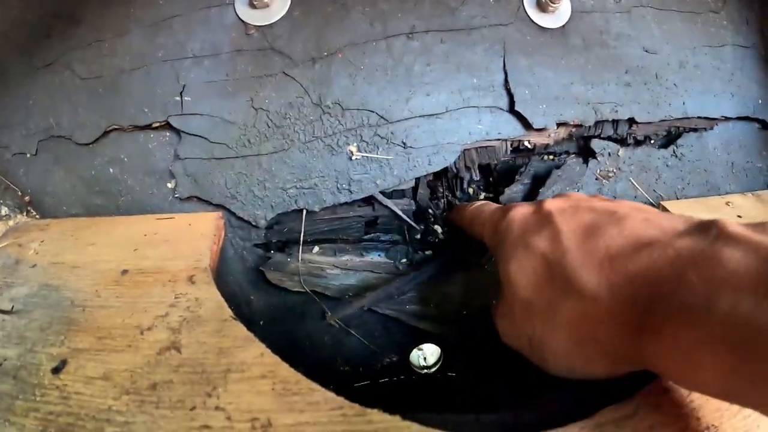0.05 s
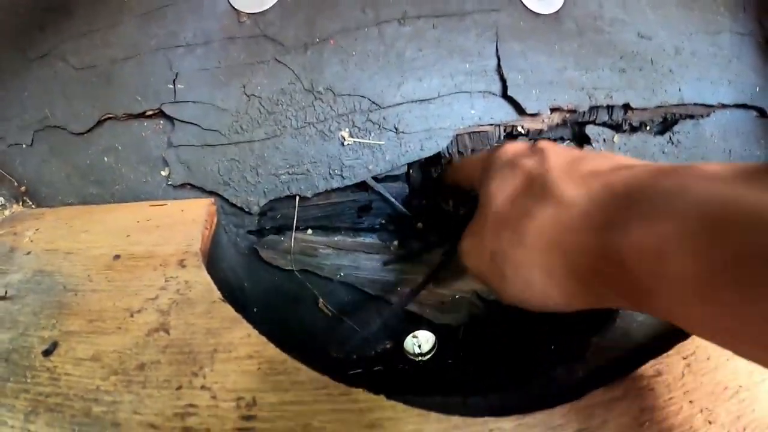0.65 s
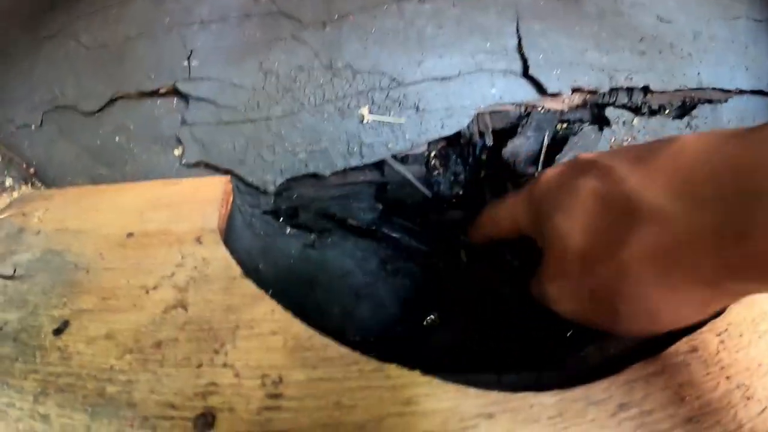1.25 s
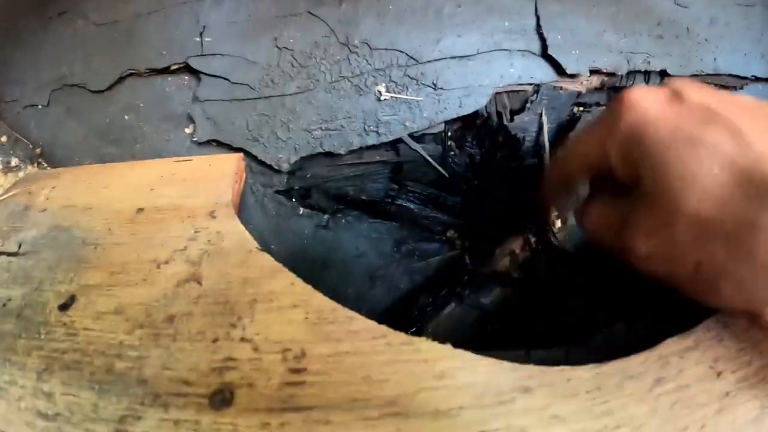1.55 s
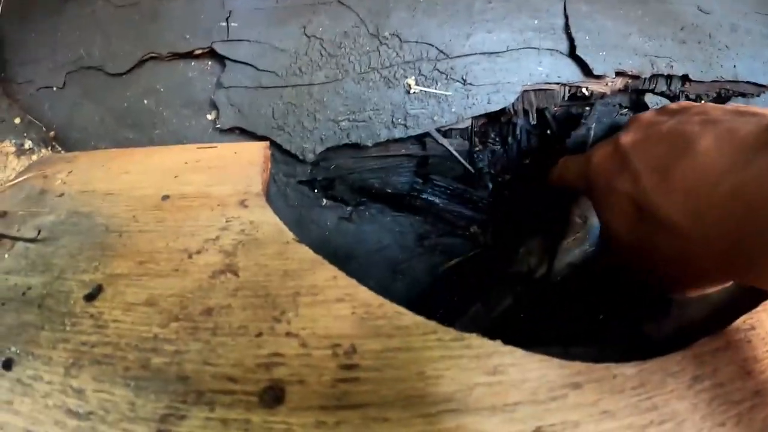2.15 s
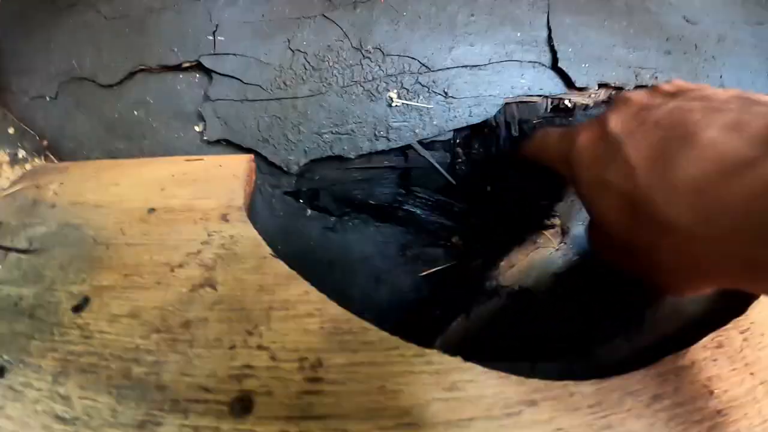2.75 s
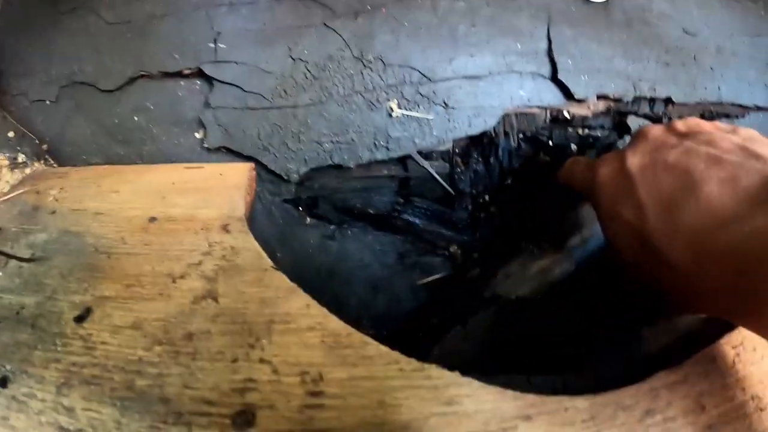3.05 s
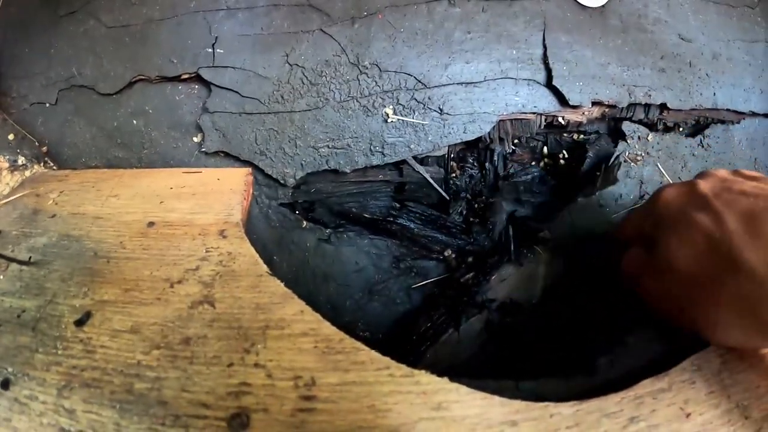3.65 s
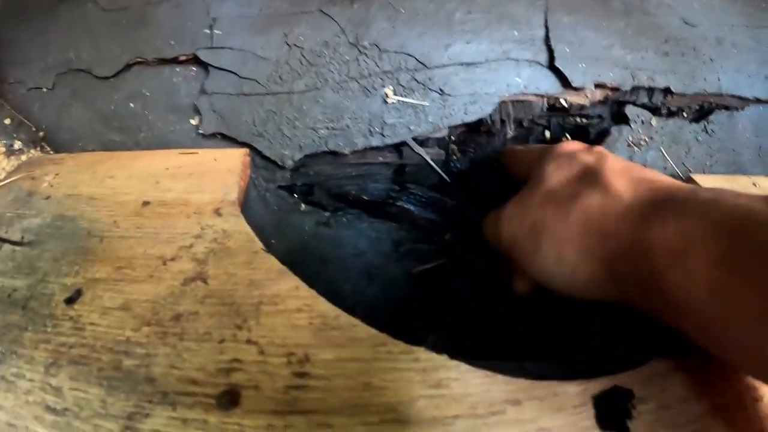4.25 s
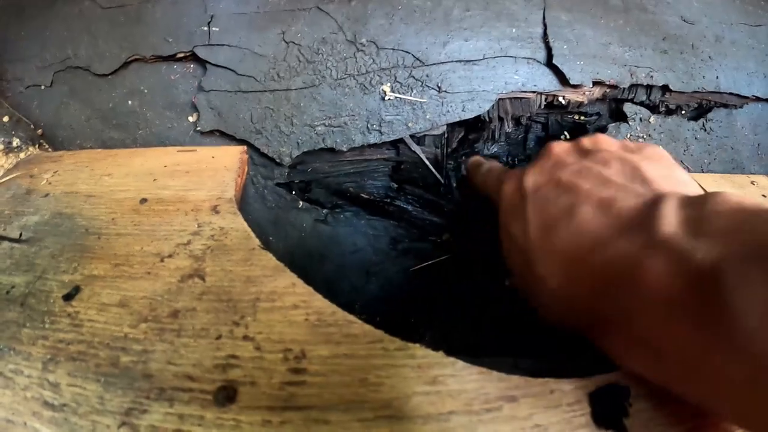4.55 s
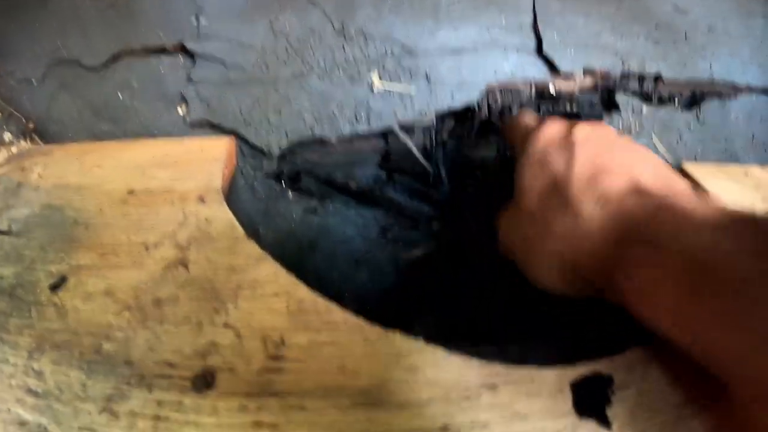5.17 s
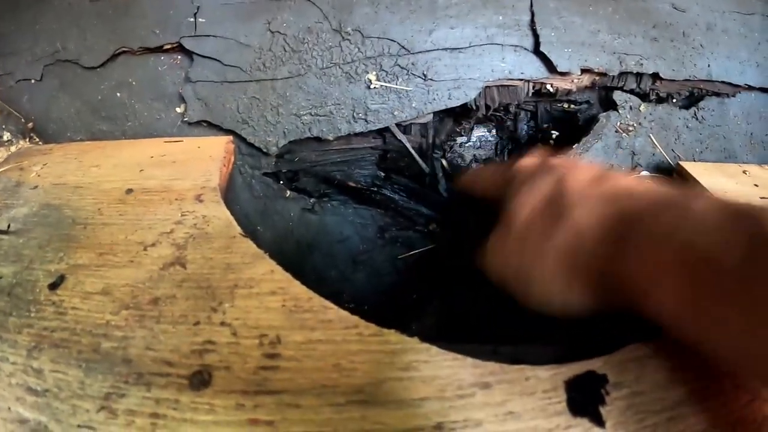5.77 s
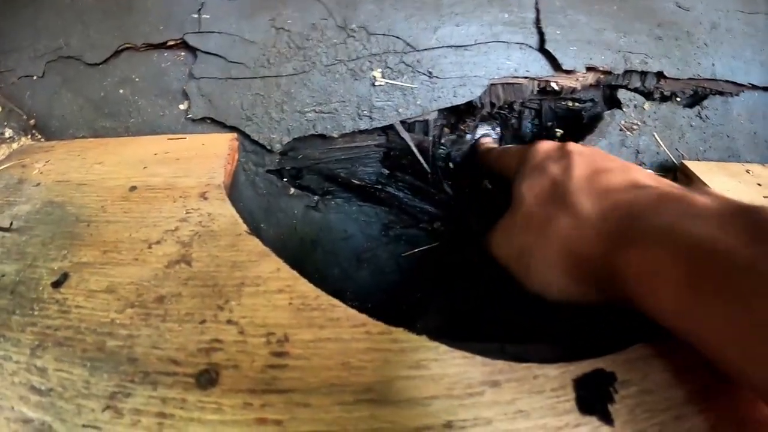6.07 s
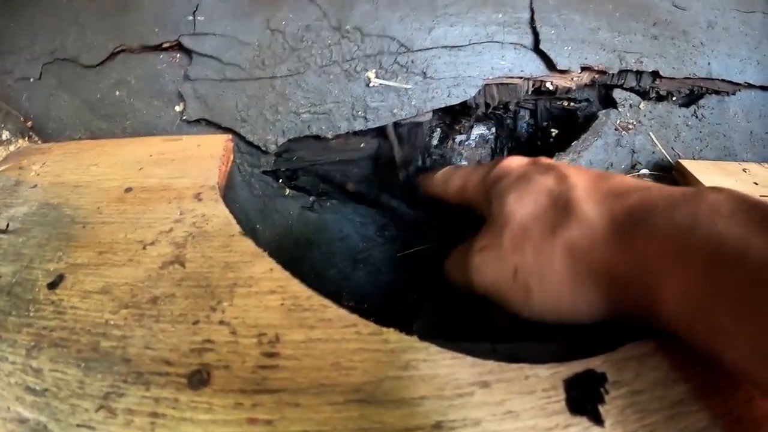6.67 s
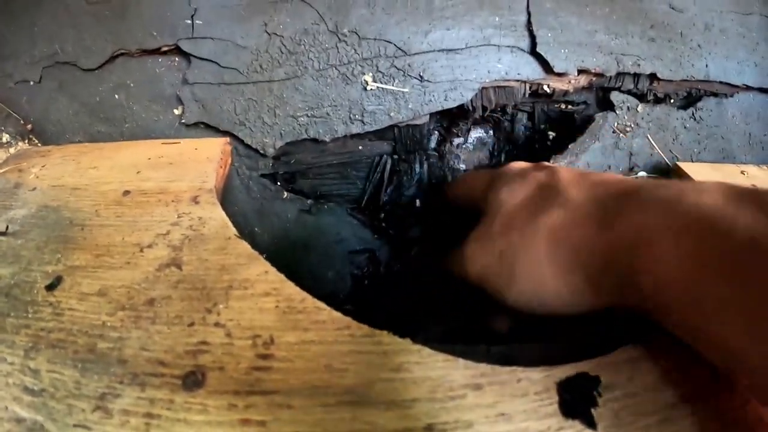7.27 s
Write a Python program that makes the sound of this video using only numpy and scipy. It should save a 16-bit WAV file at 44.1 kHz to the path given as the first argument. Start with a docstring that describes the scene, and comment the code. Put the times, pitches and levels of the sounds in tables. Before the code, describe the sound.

Decayed wood cracks and crumbles under a digging hand, with dull thumps on hollow boards and a low room rumble.

```python
"""Rotten wood snaps and crumbles as fingers tear it out of a hole in a boarded panel, close up.
Each fibre breaks with a crack that rings the boards; each scrape is a spray of tiny fractures.
Jabs of the hand thump the hollow panel and set it swaying. Skin fizzes over the dry fibres,
a loose chip knocks and crumbs tick in between, in a small workshop with low rumble and faint hiss."""
import sys
import numpy as np
from scipy import signal
from scipy.fft import rfft, irfft
from scipy.io import wavfile

SR = 44100
rng = np.random.default_rng(int(sys.argv[2]) if len(sys.argv) > 2 else 0)


def wrap_up_sound(samples):
    """Save the sound to the file named by the first command line argument, as 16-bit audio."""
    columns = np.atleast_2d(samples).T
    # keep every value between -1 and 1, then stretch to whole-number steps
    tamed = np.clip(columns, -1, 1)
    steps = np.round(tamed * 32767).astype(np.int16)
    wavfile.write(sys.argv[1], SR, steps)


N = 327222
T = np.arange(N) / SR

# room tone fader moves: t/s, hiss level/dB, rumble level/dB
ROOM_TONE_LEVELS = [(0, -54.5, -40), (.7, -55.5, -35.5), (2.4, -57, -42), (4, -58.5, -39.5),
                    (5.6, -60, -37), (6.5, -63.5, -39.5), (7.42, -59, -43.5)]
# tone of the workshop rumble: f/Hz, level/dB
RUMBLE_EQ = [(20, -15.5), (35, -12.5), (52, -0.5), (70, -1), (95, 0), (125, -13.5), (170, -16.5),
             (215, -15), (290, -35.5), (400, -47), (700, -38.5), (4000, -118)]
# tone of the hiss: f/Hz, level/dB
HISS_EQ = [(350, 5), (550, 3), (1000, 1), (2000, -4), (3300, 1), (5000, -6.5), (8000, -14.5), (10000, -24),
           (13000, -45), (16000, -62)]
# tone of skin on dry fibres: f/Hz, level/dB
SKIN_EQ = [(1500, -18), (4000, 6), (6500, 5), (8600, 3), (10500, -2), (13000, -3.5), (16000, -15)]
# skin brushing the fibres: peak t/s, length/s, relative level/dB
SKIN_RUBS = [(0.436, 0.29, -70), (1.12, 0.88, -68), (1.49, 0.27, -78), (2.003, 0.26, -61.5),
             (2.44, 0.16, -64), (2.96, 0.29, -66), (3.45, 0.64, -71), (4.213, 0.2, -77.5), (5.0, .3, -74),
             (5.392, 0.37, -65.5), (6.75, 1, -83), (7.41, 0.21, -69)]
# a loose chip hitting the boards: t/s, peak level/dB
CHIP_KNOCKS = [(1.431, -23), (2.428, -31.5), (2.673, -14), (3.04, -32), (3.4, -38), (7.1, -40)]
# modes of the chip: f/Hz, level/dB, t60/s
CHIP_MODES = [(1050, -14, 0.04), (1433, 0, 0.029), (1740, -4, 0.023), (2740, -9.5, 0.017)]
# the hand jabbing the panel: t/s, relative thump level/dB, contact/ms, relative sway level/dB
HAND_JABS = [(0.18, -29.5, 5.5, -50), (0.909, -11, 2.7, -52), (1.338, -31.5, 2, -51),
             (1.397, -23.5, 1.4, -37), (1.858, -26.5, 2.4, -52), (1.936, -21, 9.8, -35),
             (2.635, -31.5, 3.5, -57), (2.947, -25, 9.3, -49), (2.978, -24.5, 6.3, -30),
             (3.041, -27, 7.7, -34), (3.14, -26.5, 14, -34.5), (3.591, -21.5, 6.1, -42),
             (3.63, -13, 2.7, -17.5), (4.153, -26, 8.9, -39), (4.358, -16, 2.36, -38),
             (4.57, -21, 5.2, -32.5), (4.681, -18, 4, -48), (4.713, -26.5, 1.7, -58),
             (5.042, -26.5, 1.34, -58), (5.108, -13, 1.74, -24), (5.421, -24.5, 3.1, -29),
             (5.46, -11.5, 1.5, -21.5), (5.751, -22, 4.6, -52), (5.868, -9.5, 1.35, -23),
             (6.077, -33.5, 2, -53), (6.253, -8, 4.4, -40), (6.274, -12, 3.2, -27), (6.946, -30, 6.6, -39)]
# bending modes of the panel: f/Hz, level/dB, t60/s
PANEL_MODES = [(71.9, 2.5, 0.18), (101.2, -1.5, 0.11), (124.6, -3, 0.054), (169.8, -2.5, 0.104),
               (210.7, -8.5, 0.098), (264.7, -8.5, 0.056), (348, -15.5, 0.037), (392, -22, 0.041),
               (478, -15, 0.079), (554, -23, 0.022), (713, -36.5, 0.14)]
# peaks and dips of the boards around the hole: f/Hz, width/Hz, level/dB
BOARD_EQ = [(537, 52, 4.5), (760, 120, -5), (970, 22, -13), (1028, 24, 4.5), (1426, 190, 4.5),
            (1948, 100, 4.5), (2460, 100, -0.5), (2994, 290, 2.5), (3730, 110, 4), (5360, 140, 4),
            (8050, 410, 2)]
# tone of breaking fibres: f/Hz, level/dB
FIBRE_EQ = [(100, -31), (280, -4), (500, 1), (1200, 2.5), (2500, -0.5), (4500, -2), (8000, -6.5),
            (10000, -13.5), (13000, -16.5), (16000, -27)]
# a finger dragging through soft wood: peak t/s, length/s, mid (1-4 kHz) level/dB, body re mid/dB, treble re
# mid/dB, splinter ring f/Hz
FINGER_SCRAPES = [(0.598, 0.088, -59, -9, -20, 2240), (0.991, .17, -44.5, -1, -5, 3070),
                  (1.048, 0.049, -56.5, 10, -6, 1100), (1.365, 0.074, -34.5, -5, -6, 2220),
                  (1.407, 0.051, -35, 1, -17, 930), (1.437, 0.046, -32.5, -15, -24, 1500),
                  (1.468, 0.11, -46.5, -8.5, -11, 1820), (1.583, 0.19, -49.5, -3.5, -14, 4000),
                  (1.881, .1, -51.5, 0.5, -10, 1410), (1.976, .14, -51.5, 1.5, -5, 1350),
                  (2.428, 0.16, -51.5, -5, -12, 1450), (2.551, 0.064, -45.5, -6, -6.5, 1570),
                  (2.651, 0.074, -36, -4.5, -10.5, 1520), (2.963, 0.074, -47, 2.5, -13, 735),
                  (3.587, 0.1, -49, 4, -5.5, 2050), (3.633, 0.047, -29, 1, -13.5, 1480),
                  (3.723, 0.079, -50.5, -8, -25, 1030), (3.839, 0.11, -50.5, -7, -19, 2580),
                  (4.003, 0.042, -48.5, 0.5, -13.5, 2140), (4.173, 0.093, -59, -2, 2, 3170),
                  (4.221, 0.09, -54.5, 2, -8.5, 900), (4.37, .1, -47.5, 1.5, 0.5, 2800),
                  (4.401, .06, -48, 0, -7.5, 1050), (4.567, 0.11, -51.5, 1, -10.5, 2170),
                  (4.705, 0.085, -45.5, 1, -6.5, 1300), (4.813, 0.08, -59.5, 6, -27, 1370),
                  (4.941, .028, -42.5, -2.5, -7, 1380), (5.119, 0.047, -43, 3, -2.5, 1000),
                  (5.442, 0.1, -52.5, 2, -27, 1010), (5.469, .04, -43, 8, -9.5, 950),
                  (5.769, 0.086, -54.5, -2.5, -13.5, 2870), (5.877, 0.017, -47, -2, -12, 1020),
                  (5.904, 0.057, -48, -9, -7, 3580), (6.25, 0.018, -35.5, 10, -39, 1020),
                  (6.29, 0.043, -52, 6.5, -3.5, 480), (6.678, 0.12, -55, -5, -4, 3460),
                  (6.798, 0.17, -49, -2, -6.5, 1950), (6.88, 0.12, -36, -10, -5, 2550),
                  (6.938, 0.055, -32.5, -5, -8, 2370), (7.001, .1, -51, -13, -7, 2300)]
# fibres breaking: t/s, mid (1-4 kHz) level/dB, body re mid/dB, treble re mid/dB, splinter ring f/Hz
FIBRE_SNAPS = [(0.502, -47, -13, -12, 3240), (0.59, -43.5, -11, -13, 2380), (0.811, -56, 11, -26, 1610),
               (0.984, -38.5, -12, -9, 3000), (0.992, -27.5, -32, -12, 3170), (1.055, -43.5, 0, -21, 1200),
               (1.147, -32.5, -18.5, -10.5, 3510), (1.194, -41.5, -6, -2.5, 4500),
               (1.276, -45.5, -17, 0, 3580), (1.31, -40, -6, -8, 3300), (1.328, -31.5, -23, -9, 3530),
               (1.341, -27.5, 0, -6, 1840), (1.465, -31, -15, -16.5, 1820),
               (1.576, -39.5, -32, -12.5, 3400), (1.701, -66, -7, 16, 7100), (2.002, -40.5, 1, -4, 1430),
               (2.071, -50.5, -4, 3, 5140), (2.09, -52, 1, -3, 1040), (2.15, -50.5, 4.5, 0.5, 3000),
               (2.456, -41, -9, -3.5, 1480), (2.51, -47, -11, -6, 1450), (3.007, -48, 10, -11, 1470),
               (3.213, -52.5, 0, -14, 985), (3.553, -33.5, -12, -20.5, 2440),
               (3.584, -37.5, 0.5, -28, 1490), (3.624, -22, -4.5, -18.5, 1390), (3.848, -45, -13, -18, 990),
               (3.959, -66, -16, 6, 4180), (4.933, -37, -17, -8.5, 1480), (5.045, -47.5, -3, -11.5, 3780),
               (5.462, -69, -7, -10, 920), (5.87, -37.5, 1, -12.5, 1300), (6.254, -37, 3, -10.5, 1170),
               (6.278, -42, 13.5, -16, 940), (6.791, -39.5, -23, -12, 2080),
               (6.837, -27.5, -26, -11.5, 1980), (6.848, -28, -28, -7, 2460), (6.869, -27, -29, -1, 2460),
               (6.878, -24, -26, -18, 2370), (6.903, -41.5, -6, 3.5, 3080)]

RISE_SHARE = .46  # part of a stroke spent building up pressure


def undb(db):
    """Decibels to gain."""
    return 10 ** (np.asarray(db) / 20)


def unit(x):
    """Scale to an rms of 1."""
    return x / np.sqrt(np.mean(x ** 2) + 1e-20)


def pan(left_db):
    """Stereo gains with the left side left_db above the right."""
    return undb(np.array([[left_db], [-left_db]]) / 2)


def decay(t, t60):
    """A tail that falls 60 dB in t60 seconds."""
    return np.exp(-np.log(1000) * t / t60)


def wander(t, per_s):
    """A control signal that glides between random values."""
    return np.interp(t * per_s, np.arange(100), rng.standard_normal(100))


def add(out, x, s):
    """Mix x into out from time s on."""
    i = int(np.clip(s * SR, 0, N - 1))
    out[..., i:i + x.shape[-1]] += x[..., :N - i]


def freqs(size):
    """Bin frequencies of a real transform."""
    return np.maximum(np.fft.rfftfreq(size, 1 / SR), 1)


def eq_gain(points, f):
    """Gain at f of an EQ curve of (f/Hz, level/dB) points."""
    hz, db = np.transpose(points)
    return undb(np.interp(np.log(f), np.log(hz), db))


def causal(gain):
    """The minimum-phase response with this gain: it rings only after the hit."""
    cepstrum = irfft(np.log(gain + 1e-6))
    half = len(cepstrum) // 2
    folded = np.r_[cepstrum[0], 2 * cepstrum[1:half], np.zeros(half)]
    return irfft(np.exp(rfft(folded)))


def convolve(x, response):
    """Filter x with a response; either may be stereo."""
    return signal.fftconvolve(np.atleast_2d(x), np.atleast_2d(response), axes=1)


def noise(eq):
    """Noise shaped by an EQ curve, rms 1."""
    return unit(irfft(rfft(rng.standard_normal(N)) * eq_gain(eq, freqs(N)), N))


def room_tone(rumble_side_db=-37, hiss_side_db=-4, waver_db=-2.5):
    """The bed: a wavering, nearly mono rumble and a wide hiss that drifts down in level."""
    times, *levels = np.transpose(ROOM_TONE_LEVELS)
    hiss_db, rumble_db = (np.interp(T, times, db) for db in levels)
    side = np.array([[1], [-1]])
    waver = wander(T, per_s=6)
    rumble = noise(RUMBLE_EQ) + side * undb(rumble_side_db) * noise(RUMBLE_EQ)
    hiss = noise(HISS_EQ) + side * undb(hiss_side_db) * noise(HISS_EQ)
    return rumble * undb(rumble_db + waver_db * waver), hiss * undb(hiss_db)


def reflections(t60, band_hz, delay_s, count=26000):
    """A fading, band-limited wash of echoes, different left and right."""
    t = T[:count]
    wash = rng.standard_normal((2, count)) * decay(t, t60) * (t > delay_s)
    wash = unit(wash) / np.sqrt(count)
    return signal.sosfilt(signal.butter(1, band_hz, "band", fs=SR, output="sos"), wash)


def workshop(x, send_db=-19):
    """Add the faint, tight reverb of a small, cluttered room."""
    room = reflections(t60=.14, band_hz=[490, 6700], delay_s=.005)
    return x + undb(send_db) * convolve(x.mean(axis=0), room)[:, :N]


def close_mics(x, lag_ms=.032, echo_db=-4, pan_db=.9, size=1024, lead=16):
    """Place a sound on a close stereo pair, with its own lag and quick echoes off hand and hole."""
    left_lag_s = lag_ms / 1000 * (1 + .45 * rng.standard_normal())
    taps = np.arange(size) - lead
    paths = np.sinc([taps - left_lag_s * SR, taps]) * pan(pan_db)
    paths += undb(echo_db) * reflections(t60=.022, band_hz=[1800, 18000], delay_s=.0004, count=size)
    paths[0] = np.convolve(paths[0], [.12, .76, .12], "same")  # the left mic faces away: duller
    return convolve(x, paths)[:, lead:lead + len(x)]


def grains(count, per_s, spread_db):
    """Tiny fractures at random moments: many faint, a few strong."""
    hits = rng.random(count) < per_s / SR
    polarity = rng.choice([-1, 1], count)
    return hits * polarity * undb(spread_db * np.minimum(rng.exponential(size=count), 4))


def stroke(t, length, edge_db):
    """Finger pressure: it swells from edge_db to a peak at t = 0, then lets go."""
    return undb(edge_db * np.maximum(-t / RISE_SHARE, t / (1 - RISE_SHARE)) / length)


def wood(ring_hz, ring_db, ring_q, size=2048):
    """The boards' response to one breaking fibre, plus the ring of the splinter itself."""
    f = freqs(size)
    boards_db = sum(db / (1 + (2 * (f - hz) / width) ** 2) for hz, width, db in BOARD_EQ)
    splinter_db = ring_db / (1 + (2 * ring_q * (f / ring_hz - 1)) ** 2)
    return causal(eq_gain(FIBRE_EQ, f) * undb(boards_db + splinter_db))


def colour(x, seconds, mid_db, body_db, treble_db, size=1024):
    """Set a burst's mid level over this duration, then shelve its body and treble against it."""
    bands_hz = [(300, 900), (1000, 4000), (5000, 15000)]
    f = freqs(len(x))
    power = 2 * abs(rfft(x)) ** 2 / len(x) / (seconds * SR)
    band_db = np.array([10 * np.log10(power[(f > lo) & (f < hi)].sum() + 1e-20) for lo, hi in bands_hz])
    body, mid, treble = mid_db + np.array([body_db, 0, treble_db]) - band_db
    shelves = eq_gain([(700, body - mid), (1400, 0), (3600, 0), (6000, treble - mid)], freqs(size))
    return undb(mid) * convolve(x, causal(shelves))[0]


def skin_rubs(rest_db=-86.5, width_db=-2, pan_db=-2, gain_db=5):
    """Skin brushes the dry fibres: a fine, wide fizz that swells with each rub."""
    rubs = sum(undb(db) * stroke(T - s, length, edge_db=-18) for s, length, db in SKIN_RUBS)
    centre, left, right = (grains(N, per_s=5000, spread_db=6.5) for _ in range(3))
    friction = centre + undb(width_db) * np.array([left, right])
    fizz = convolve(friction, causal(eq_gain(SKIN_EQ, freqs(512))))[:, :N]
    return unit(fizz) * (undb(rest_db) + rubs) * undb(gain_db) * pan(pan_db)


def shedding(trickle_db=-58, stirred_db=-53, usual_scrape_db=-56.5, settle_db_s=62, clear_db_s=2.6):
    """Crumb level in dB: it swells around each scrape and sinks as the hole is cleared."""
    level_db = trickle_db
    for s, _, db, *_ in FINGER_SCRAPES:
        shed_db = stirred_db + .32 * (db - usual_scrape_db)  # a harder scrape sheds more
        level_db = np.maximum(level_db, shed_db - settle_db_s * abs(T - s))
    return level_db - clear_db_s * T


def crumbs(sizes=12, per_size_per_s=14, bounce_s=.0029):
    """Loose bits of many sizes drop and rattle under the hand, each size at its own pitch."""
    bits, t = 0, T[:SR // 100]
    for hz in np.geomspace(850, 4600, sizes):
        rattle = rng.standard_normal(len(t)) * np.exp(-t / bounce_s)
        tick = unit(convolve(rattle, wood(hz, ring_db=12, ring_q=4)))
        bits = bits + convolve(grains(N, per_size_per_s, spread_db=4.5), tick)[0, :N]
    return close_mics(unit(bits) * undb(shedding()))


def chip_knocks():
    """A freed chip knocks on the boards and rings briefly, always with the same modes."""
    out, t = np.zeros((2, N)), T[:4000]
    ring = sum(undb(db) * np.sin(2 * np.pi * hz * t) * decay(t, t60) for hz, db, t60 in CHIP_MODES)
    for s, peak_db in CHIP_KNOCKS:
        add(out, close_mics(ring / abs(ring).max() * undb(peak_db)), s)
    return out


def panel_sways(hz=35, rise_s=.022, delay_s=.0246, gain_db=3):
    """Sub weight: after each jab the panel swings back on its supports for a few slow cycles."""
    out, t = np.zeros(N), T[:16000]
    swing = np.sin(2 * np.pi * hz * t) * t / rise_s * np.exp(1 - t / rise_s)
    for s, _, _, db in HAND_JABS:
        add(out, swing * undb(db + gain_db), s + delay_s)
    return out


def panel_thumps(gain_db=2, scatter_db=2.5, detune=.024, travel_s=.004):
    """Each jab rings the hollow panel; a longer contact is duller, and each spot favours other modes."""
    out, t = np.zeros(N), T[:16000]
    hz, db, t60 = np.transpose(PANEL_MODES)[:, :, None]
    # low bending waves travel slowest, so the thump starts high and sinks
    age = np.maximum(t - travel_s * np.sqrt(hz[0] / hz), 0)
    for s, level_db, contact_ms, _ in HAND_JABS:
        level_draw, pitch_draw = rng.standard_normal((2, len(PANEL_MODES), 1))
        tones = np.sin(2 * np.pi * hz * (1 + detune * pitch_draw) * age)
        modes = undb(db + scatter_db * level_draw) * tones * decay(age, t60)
        contact = t * 1000 / contact_ms
        force = contact ** 2 * np.exp(-5 * contact)
        thump = convolve(modes.sum(axis=0), np.diff(force))[0]
        add(out, thump / abs(thump).max() * undb(level_db + gain_db), s)
    return out


def finger_scrapes(catch_per_s=170, catch_db=4.5):
    """Soft wood crumbles into gritty grains under a sliding finger that catches and slips."""
    out, t = np.zeros((2, N)), T[:SR // 4]
    for s, length, db, body_db, treble_db, hz in FINGER_SCRAPES:
        rise_s = RISE_SHARE * length
        catches = undb(catch_db * wander(t, catch_per_s))
        pressure = stroke(t - rise_s, length, edge_db=-16)
        grit = grains(len(t), per_s=9000, spread_db=3) * pressure * catches
        scrape = convolve(grit, wood(hz, ring_db=8, ring_q=4))[0]
        add(out, close_mics(colour(scrape, length / 2, db, body_db, treble_db)), s - rise_s)
    return out


def fibre_snaps(crack_ms=2, tear_ms=7, tear_db=-12, tick_db=2.5, snap_s=.01):
    """A fibre gives way with a tick and a crack that rings the splinter; its neighbours tear after."""
    out, ms = np.zeros((2, N)), 1000 * T[:2400]
    for s, db, body_db, treble_db, hz in FIBRE_SNAPS:
        crack = rng.standard_normal(len(ms)) * np.exp(-ms / crack_ms)
        crack[0] += undb(tick_db)
        tear = unit(grains(len(ms), per_s=4000, spread_db=2.4)) * np.exp(-ms / tear_ms)
        snap = convolve(crack + undb(tear_db) * tear, wood(hz, ring_db=9, ring_q=6))[0]
        add(out, close_mics(colour(snap, snap_s, db, body_db, treble_db)), s)
    return out


def scene(bass_pan_db=1.06):
    """The mix: breaking wood in the room over the bed; panel and rumble lean a little left."""
    rumble, hiss = room_tone()
    tearing = fibre_snaps() + finger_scrapes() + chip_knocks() + crumbs() + skin_rubs()
    panel = panel_thumps() + panel_sways()
    lean = pan(bass_pan_db)
    return workshop(tearing + lean * panel) + lean * rumble + hiss


def record(dry, left_cut_hz=10, right_cut_hz=28, top_hz=16000):
    """Each mic rolls off the deepest bass at its own corner; a steep low-pass trims the top."""
    low_cuts = [signal.butter(1, hz, "high", fs=SR, output="sos") for hz in (left_cut_hz, right_cut_hz)]
    mics = np.array([signal.sosfilt(cut, x) for cut, x in zip(low_cuts, dry)])
    return signal.sosfilt(signal.ellip(8, .2, 70, top_hz, fs=SR, output="sos"), mics)


dry = scene()
out = record(dry)
wrap_up_sound(out)
```